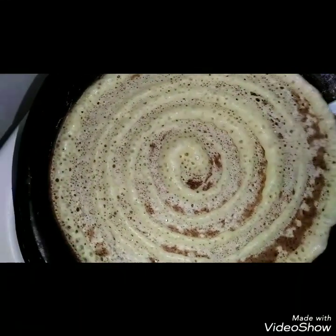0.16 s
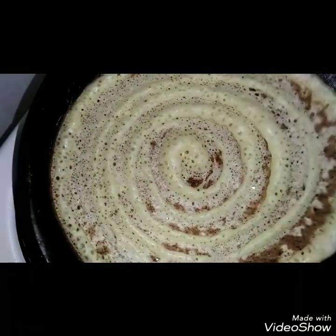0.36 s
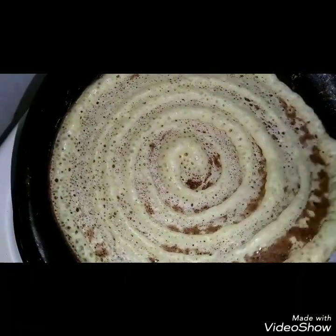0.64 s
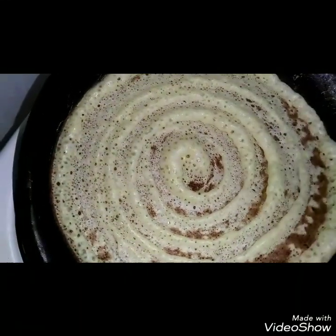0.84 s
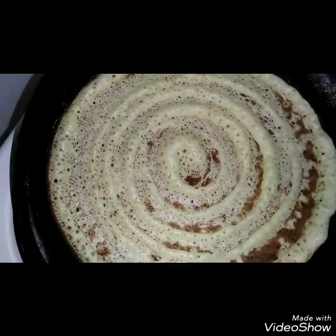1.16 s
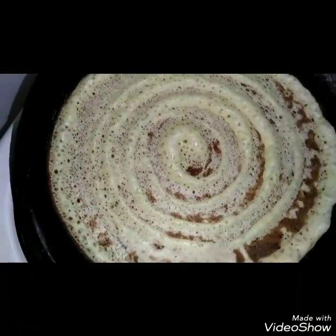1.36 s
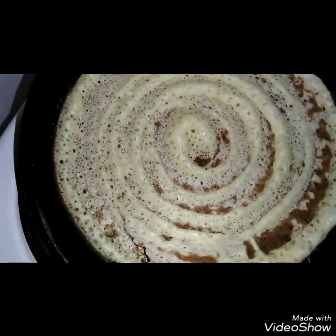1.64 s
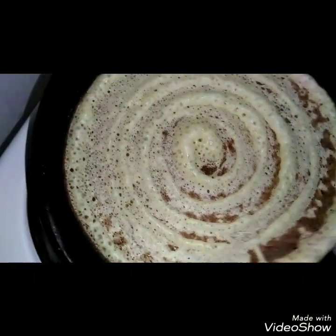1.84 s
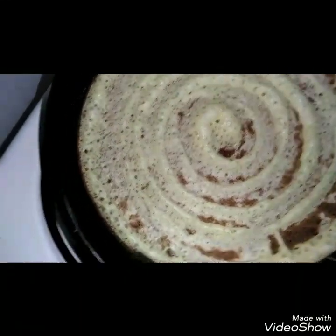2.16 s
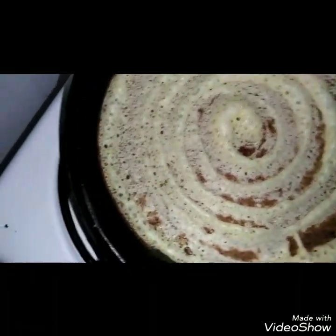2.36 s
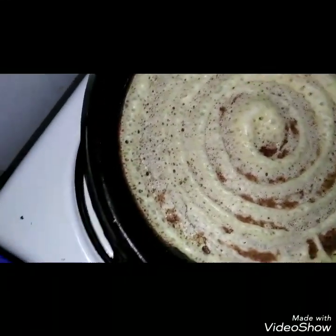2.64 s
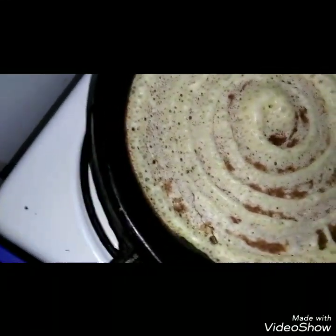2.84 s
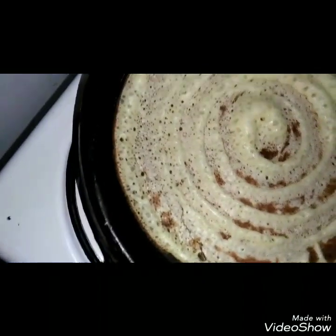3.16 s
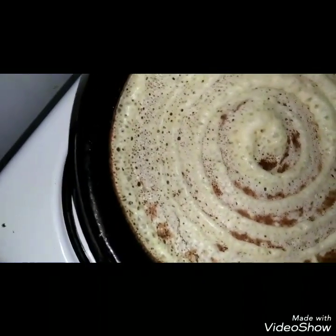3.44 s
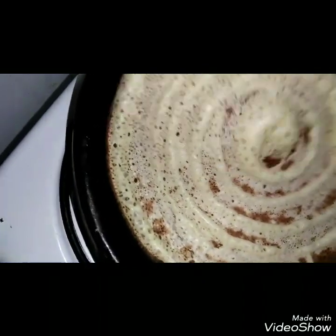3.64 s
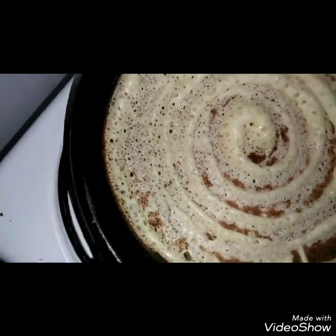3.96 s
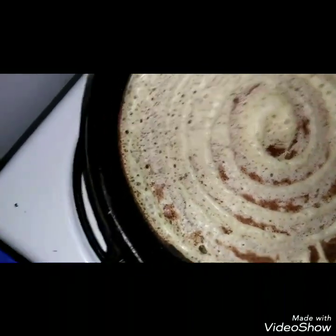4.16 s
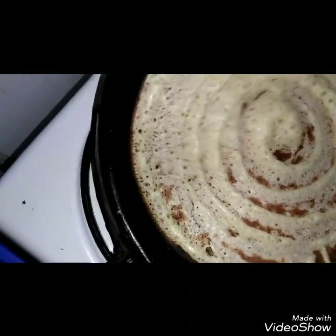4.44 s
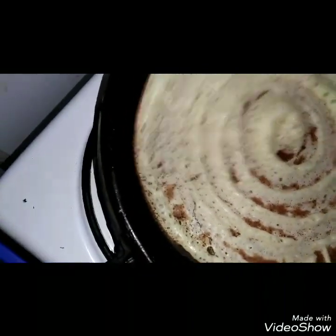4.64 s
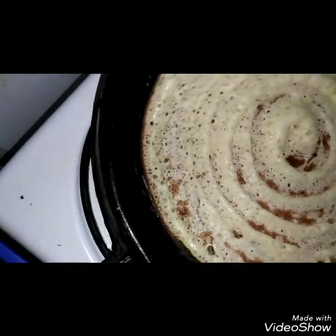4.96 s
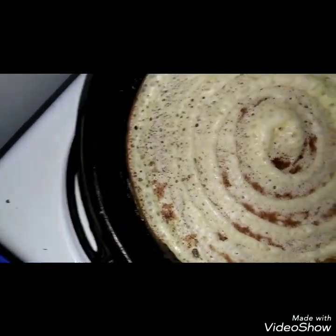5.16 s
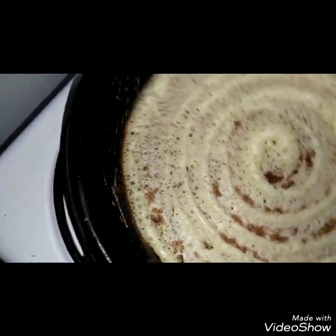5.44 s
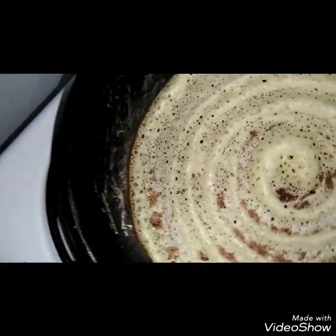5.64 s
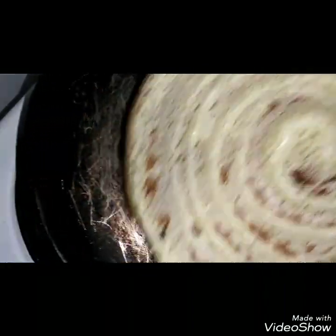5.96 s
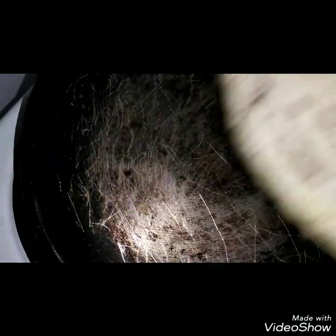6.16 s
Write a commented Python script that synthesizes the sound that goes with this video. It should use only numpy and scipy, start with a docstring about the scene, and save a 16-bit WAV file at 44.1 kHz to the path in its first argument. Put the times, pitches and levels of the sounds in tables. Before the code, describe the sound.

A metal spatula rasps and clicks in quick strokes on an iron pan, which judders and knocks on its stove grate midway.

```python
"""A steel spatula rasps under a thin pancake in quick strokes and clicks on the iron pan, right of a phone.
Rasps, clicks and jabs are noise forces sent through the ringing tones (modes) of blade and pan.
Taps, pings and singing tones are added directly. The pan rocks and drags on the burner grate, hardest
about three seconds in, as rubbing noise and knocks. A small kitchen hums softly and answers with echoes."""
import sys
import numpy as np
from scipy import signal
from scipy.fft import rfft, irfft, next_fast_len
from scipy.io import wavfile
from scipy.ndimage import uniform_filter1d, map_coordinates

SR = 44100
rng = np.random.default_rng(int(sys.argv[2]) if len(sys.argv) > 2 else 0)


def bounce(signal):
    """Save signal as a 16-bit WAV file at the path given by the first command-line argument."""
    frames = np.transpose(np.atleast_2d(signal))
    limited = np.clip(frames, -1, 1)
    pcm = np.round(limited * 32767).astype(np.int16)
    wavfile.write(sys.argv[1], SR, pcm)


N = 277389


def amp(db):
    """Decibels to gain."""
    return 10 ** (np.asarray(db) / 20)


def unit(x):
    """Scaled to rms 1."""
    return x / np.sqrt(np.mean(x ** 2) + 1e-20)


def along(points, hz):
    """Reads a curve of (frequency, value) points, joined by straight lines on a log frequency axis."""
    f, v = np.transpose(points)
    return np.interp(np.log(hz + 1), np.log(f + 1), v)


def wobble(rate):
    """A smooth random curve through this many random points a second."""
    points = rng.standard_normal(int(N * rate / SR) + 4)
    return map_coordinates(points, [np.arange(N) * rate / SR])


def filtered(x, response):
    """Filters x by a gain, real or complex, given as a function of frequency."""
    m = next_fast_len(N + SR // 2)
    return irfft(rfft(x, m) * response(np.fft.rfftfreq(m, 1 / SR)), m)[..., :N]


def causal(gain):
    """The minimum-phase filter with this gain: it answers as early as it can, never beforehand."""
    cep = irfft(np.log(gain + 1e-6))
    half = len(cep) // 2
    cep[1:half] *= 2
    cep[half + 1:] = 0
    return np.exp(rfft(cep))


def modes(table, f, sign=-1):
    """Sum of resonances (Hz, width Hz, dB); equal signs leave dark valleys between them."""
    total = 0
    for k, (hz, width, db) in enumerate(table):
        resonance = 1j * f * width / (hz * hz - f * f + 1j * f * width)  # 1 at its top
        total = total + sign ** k * amp(db) * resonance
    return total


def bands(f, borders_hz, steepness):
    """Power share of each frequency in each band between the borders."""
    below = [0 * f] + [1 / (1 + (f / hz) ** steepness) for hz in borders_hz] + [1 + 0 * f]
    return np.diff(below, axis=0)


def gestures(start, hold, first_db, last_db, swell, fade):
    """Efforts swell, hold and fade at dB per second; (event, part) levels give one gain curve per part."""
    t = np.arange(0, N / SR + .002, .001)
    since = t - start[:, None, None]
    hold = hold[:, None, None] + .001
    db = first_db[..., None] + (last_db - first_db)[..., None] * np.clip(since / hold, 0, 1)
    db = db - swell * np.clip(-since, 0, None)
    db = db - np.reshape(fade, (-1, 1)) * np.clip(since - hold, 0, None)
    gains = np.sqrt(np.sum(amp(db) ** 2, axis=0))
    return np.array([np.interp(np.arange(N) / SR, t, gain) for gain in gains])


def grit(patchy_db, size):
    """Noise whose colour drifts as the point of contact moves over the pan."""
    z = signal.stft(rng.standard_normal(N), nperseg=256)[2]
    field = uniform_filter1d(rng.standard_normal(z.shape), size=2, axis=0)  # smooth over frequency
    field = unit(uniform_filter1d(field, size=size, axis=1))  # and over time
    patches = amp(patchy_db * 1.5 * np.tanh(field / 1.5))
    return unit(signal.istft(z * patches, nperseg=256)[1][:N])


def add(forces, s, burst, parts_db, ring_db, pan_db):
    """Lays one contact on the five parts, as rasp and ring, for the right and the left port."""
    rasp_and_ring_db, right_and_left_db = [0, ring_db], [0, pan_db]
    gains = amp(np.add.outer(np.add.outer(rasp_and_ring_db, right_and_left_db), parts_db))
    forces[..., round(s * SR):][..., :len(burst)] += gains[..., None] * burst


# colour of the kitchen air: (frequency [Hz], relative level [dB])
HUM_COLOUR = [(12, -79.5), (20, -22), (69, -10.5), (102, -2.5), (195, -7), (224, -2.5), (273, -14),
              (332, -4.5), (428, -17), (772, -13.5), (1280, -20.5), (2240, -23.5), (2730, -24),
              (3520, -23.5), (6000, -27), (9000, -31), (16500, -62)]
# how alike the hum is at both ports: (frequency [Hz], likeness [-1 to 1])
HUM_LIKENESS = [(30, 0.82), (70, 0.77), (180, 0.83), (550, 0.44), (1650, -0.13), (4970, -0.28),
                (15000, -0.05)]
HUM_DB = -71.5


def hum():
    """Gently wavering kitchen air: alike at both ports in the bass, nearly unrelated in the treble."""
    turn = lambda hz: np.arccos(np.clip(along(HUM_LIKENESS, hz), -1, 1)) / 2
    pair = rng.standard_normal((2, N)) * amp(2.2 * wobble(5))
    colour = lambda hz: amp(along(HUM_COLOUR, hz)) * [np.cos(turn(hz)), np.sin(turn(hz))]
    mid, side = filtered(pair, colour)
    return amp(HUM_DB) * unit(np.array([mid + side, mid - side]))


def tail(t60, length):
    """A pair of noise tails, each frequency dying at its own speed, scaled to energy 1 in the first."""
    hz, t, z = signal.stft(rng.standard_normal((2, length)), SR, nperseg=128)
    out = signal.istft(z * amp(-60 * t / t60(hz)[:, None]), SR, nperseg=128)[1]
    return out / np.linalg.norm(out[0])


def echoes(x, t60, length, delay):
    """Scattered copies at both ports, drawn anew six times a second so no single draw colours the sound."""
    out, hop = np.zeros((2, N + SR)), SR // 6
    for at in range(0, N, hop):
        echo = signal.fftconvolve(x[None, at:at + hop], tail(t60, length), axes=1)
        out[:, at + delay:][:, :echo.shape[1]] += echo
    return out[:, :N]


# how long the kitchen echoes last: (frequency [Hz], time to fall 60 dB [s])
KITCHEN_T60 = [(200, 0.21), (2000, 0.13), (7000, 0.12), (15000, 0.21)]


def kitchen(blade, pan):
    """The small room answers the blade and the pan with short echoes, 200 samples late."""
    return echoes(amp(-12.5) * blade + amp(-3.0) * pan, lambda hz: along(KITCHEN_T60, hz), SR // 3, 200)


# the blade travels across the pan: (time [s], gain toward the left port [dB])
TRAVEL = [(0.1, 0), (0.7, 1.5), (1.3, -4), (1.8, -7.5), (2.3, 0.5), (2.65, 0.5), (2.9, -3), (3.15, 0.5),
          (3.5, -1), (3.95, -1), (4.2, -6.5), (4.7, 2.5), (5.3, 1), (5.8, -20)]
# the phone shades its left port: (frequency [Hz], left over right [dB], before a 3 dB lift)
SHADOW = [(300, -2.5), (1000, -6.5), (2200, -9), (4500, -16.5), (8000, -16), (15000, -4)]


def left_port(blade):
    """The left port hears the blade shaded by the phone and scattered off stove and hand."""
    moving = blade * amp(np.interp(np.arange(N) / SR, *np.transpose(TRAVEL)))
    shaded = filtered(moving, lambda hz: causal(amp(along(SHADOW, hz) + 3.0)))
    return echoes(shaded, lambda hz: .02 + 0 * hz, 1024, 0)[0]


# colour of the pan's dull body: (frequency [Hz], level [dB])
THUD = [(60, -52), (130, -11.5), (300, -7), (500, -12), (900, -16.5), (1400, -23.5), (2200, -88),
        (3300, -120)]
# modes of the pan on the grate: (pitch [Hz])
IRON_HZ = [164, 233, 292, 358, 441, 507, 633, 801, 1066]
# the same modes: (width [Hz], strength [dB], before a shared 7 dB lift)
IRON = [(17.94, 0), (24.2, -1.5), (15.8, -1), (16, 2), (22.1, -2.5), (15.9, -8.5), (16.07, -9), (22.8, -3),
        (23.06, -12.5)]
# borders between deep, middle and hard judder: (frequency [Hz])
JUDDER_HZ = [400, 660]
# shoves of the pan on the grate, levels before the trims in grate():
# (time [s], hold [s], deep judder [dB], middle judder [dB], hard judder [dB], shake of the phone [dB])
SHOVES = [(0.16, 0.039, -72, -67, -89, -79), (1.645, 0.051, -65, -88, -70.5, -77),
          (1.757, 0.064, -90, -100, -81, -75), (1.836, 0.017, -57.5, -96, -76, -88),
          (1.922, 0.088, -56.5, -96, -51.5, -78), (2.07, 0.055, -85, -97, -59.5, -75),
          (2.387, 0.022, -65, -78, -69, -82), (2.614, 0.16, -66.5, -85, -66, -86),
          (2.81, 0.017, -76, -66, -57, -77), (2.876, 0.09, -59.5, -74, -55, -74),
          (3.002, 0.016, -43.5, -86, -48, -82), (3.075, 0.015, -48, -72, -41.5, -65),
          (3.124, 0.057, -35, -36.5, -43.5, -59), (3.203, 0.02, -44, -39.5, -50, -71),
          (3.263, 0.033, -42.5, -53.5, -48, -68), (3.322, 0.035, -47.5, -64, -57, -72),
          (3.388, 0.046, -55.5, -41, -79, -73), (3.42, 0.05, -47, -52, -89, -80),
          (3.521, 0.046, -54.5, -70, -65.5, -82), (3.706, 0.013, -80, -98, -62, -61),
          (3.893, 0.075, -65, -59, -87, -66.5), (4.223, 0.0044, -52.5, -62, -69, -82),
          (4.553, 0.0078, -84, -93, -48, -70.5), (4.68, 0.1, -66.5, -87, -66.5, -79),
          (4.848, 0.0089, -87, -94, -61, -85), (4.928, 0.013, -88, -98, -88, -64),
          (5.147, 0.088, -69.5, -62, -99, -95)]
SHOVE_SWELL_DB_PER_S, SHOVE_FADE_DB_PER_S = 1198, 554.5
# knocks of the pan on the grate, before a 9 dB lift: (time [s], level [dB])
KNOCKS = [(3.126, -4), (3.155, -7), (3.166, -15), (3.189, -17.5), (3.197, -28.5), (3.221, -22),
          (3.393, -23), (4.233, -39)]


def pan_body(f):
    """The heavy pan answers a force with a dull thud and its low iron modes."""
    iron = [(hz, *rest) for hz, rest in zip(IRON_HZ, IRON)]
    return causal(amp(along(THUD, f))) + amp(7.0) * modes(iron, f, sign=1)


def grate():
    """The heavy pan judders along the grate and knocks on it; the phone shakes in the hand."""
    rows = np.array(SHOVES)
    *levels, shake = gestures(rows[:, 0], rows[:, 1], rows[:, 2:], rows[:, 2:],
                              SHOVE_SWELL_DB_PER_S, SHOVE_FADE_DB_PER_S)
    rub = amp(2.2 * wobble(90)) * rng.standard_normal(N)
    judder = 0
    for k, level in enumerate(levels):
        band = lambda f: pan_body(f) * causal(np.sqrt(bands(f, JUDDER_HZ, 12)[k]))
        judder = judder + level * unit(filtered(rub, band))
    blows = np.zeros(N)
    for s, db in KNOCKS:
        blows[round(s * SR)] = amp(db + 9.0)
    # the shake is a low rumble, partly shared by the two ports
    common, own = rng.standard_normal(N), rng.standard_normal((2, N))
    low_band = lambda f: (f / 85) ** 5 / (1 + (f / 85) ** 6) / (1 + (f / 110) ** 6)
    rumble = unit(filtered(common + 0.94 * own, low_band))
    return amp(-9.0) * judder + filtered(blows, pan_body), shake * amp(1.0) * rumble


# taps on the rim that ping its clearest mode until the blade damps it:
# (time [s], level [dB], time to fall 60 dB while free [s], free ring [s])
PINGS = [(2.813, -40.5, .1, 0.012), (2.889, -29, 0.13, 0.021), (2.952, -41, .1, 0.013),
         (2.9942, -21.5, 0.077, 0.028), (3.071, -35, .2, 0.018), (3.1167, -31, 0.18, 0.025),
         (3.159, -29, 0.12, 0.017), (3.276, -23.5, 0.1, 0.02), (3.536, -41, 0.1, .02),
         (3.927, -30.5, 0.09, 0.016), (4.3892, -39.5, 0.074, 0.024), (4.775, -35.5, 0.11, .02)]
PING_DAMPED_T60_S, PING_PAN_DB = 0.049, -11  # extra fall once damped; left over right


def pings():
    """The rim's mode rings alone as a short, slightly wavering tone."""
    out, t = np.zeros(N + SR), np.arange(SR // 5) / SR
    waver = np.cumsum(rng.standard_normal((len(PINGS), len(t))), axis=1) * .015
    for drift, (s, db, t60, free) in zip(waver, PINGS):
        tone = np.sin(2 * np.pi * STEEL_HZ[1] * t + drift) * (1 - np.exp(-t / 0.0014))
        damping_db = 60 * np.clip(t - free, 0, None) / PING_DAMPED_T60_S
        out[round(s * SR):][:len(t)] += tone * amp(db - 60 * t / t60 - damping_db)
    return out[:N]


# dull taps where the flat of the blade lands: (time [s], level [dB], pitch [Hz], time to fall 60 dB [ms])
TAPS = [(0.5505, -27.5, 2020, 13), (0.5497, -30.5, 3060, 8), (2.812, -55, 1390, 17), (3.128, -36, 1160, 20),
        (0.583, -33, 2000, 8.8), (0.872, -43.5, 1480, 22), (1.077, -42, 1560, 43), (1.208, -34.5, 2160, 31),
        (3.072, -33, 833, 36), (3.351, -37.5, 786, 39), (3.354, -38, 1170, 49), (3.699, -43, 920, 35),
        (3.888, -49, 920, 17), (3.897, -29, 1510, 22), (4.229, -36, 840, 18), (4.366, -37.5, 1540, 44),
        (4.555, -29, 1544, 40), (4.559, -45.5, 787, 41), (4.743, -35, 1480, 46), (4.919, -31.5, 1544, 28)]
TAP_PAN_DB, TAP_RISE_MS = 0.5, 0.3  # left over right before the shading


def taps():
    """Each tap is one quickly damped thock."""
    out, ms = np.zeros(N + SR), np.arange(SR // 10) / SR * 1000
    for s, db, hz, t60 in TAPS:
        tone = np.sin(2 * np.pi * hz * ms / 1000)
        shape = (1 - np.exp(-ms / TAP_RISE_MS)) * amp(db - 60 * ms / t60)
        out[round(s * SR):][:len(ms)] += tone * shape
    return out[:N]


# one mode of the blade catches and sings during a stroke:
# (time [s], hold [s], pitch [Hz], width of each of two resonances in a row [Hz], level [dB])
SINGS = [(0.1, 0.05, 6450, 300, -47), (0.098, 0.018, 2350, 90, -54), (0.155, 0.025, 2700, 200, -56),
         (0.157, 0.025, 1880, 130, -50), (0.36, .018, 5300, 200, -50), (0.358, .012, 6150, 250, -48),
         (0.385, .014, 5500, 500, -49), (0.36, .05, 1900, 300, -60), (0.92, .03, 2340, 80, -61),
         (0.97, 0.04, 1500, 150, -63), (1.36, 0.12, 6770, 200, -55), (1.38, 0.06, 4000, 200, -58),
         (1.37, 0.12, 2300, 250, -59), (1.375, 0.06, 1510, 150, -62), (1.8, .15, 4150, 450, -44),
         (1.96, .2, 4020, 350, -43.5), (1.78, .15, 1480, 150, -56), (1.89, .1, 6770, 80, -51),
         (2.1, .25, 6740, 150, -49), (1.97, .08, 8250, 350, -50), (2.14, .09, 8300, 400, -49),
         (2.63, .05, 2340, 70, -58), (4.11, .08, 1500, 180, -58), (4.84, .115, 2340, 110, -52),
         (4.88, .03, 1500, 150, -54), (4.745, .035, 6770, 120, -45), (4.87, .04, 5900, 150, -48),
         (5.048, .075, 6760, 70, -46), (5.045, .06, 1550, 70, -58), (5.045, .07, 2330, 60, -59),
         (1.78, .45, 14600, 700, -60), (1.78, .3, 11300, 400, -60), (1.8, .4, 9110, 150, -59),
         (3.4, 0.038, 464, 150, -50.5), (3.64, .03, 1300, 130, -59), (3.72, 0.036, 2000, 180, -54),
         (6.065, 0.051, 2250, 360, -74), (6.07, 0.048, 800, 150, -73)]
SING_EDGE_S, SING_PAN_DB = .01, -2.5  # swell and fade time; left over right before the shading


def sings():
    """Grit keeps one mode alive as a fuzzy tone: noise through a narrow resonance, twice."""
    out, t = np.zeros((2, N + SR)), np.arange(SR // 2) / SR - .1  # starts 0.1 s early for the swell
    noise = rng.standard_normal((len(SINGS), 2, len(t)))
    f = np.fft.rfftfreq(len(t), 1 / SR)
    for pair, (s, hold, hz, width_hz, db) in zip(noise, SINGS):
        tone = unit(irfft(rfft(pair) * modes([(hz, width_hz, 0)], f) ** 2, len(t)))
        outside = np.clip(-t, 0, None) + np.clip(t - hold, 0, None)
        shape = np.exp(-outside / SING_EDGE_S)
        out[:, round(s * SR):][:, :len(t)] += amp(db) * shape * tone
    return out[:, SR // 10:][:, :N]


# short jabs that rasp for a moment, levels before the trims in jabs():
# (time [s], level [dB], weight on the pan [dB], blade flex [dB], thin edge [dB], hold [ms])
JABS = [(0.076, -28, -12.5, -16, -31, 62), (0.101, -27, -14, -7, -14, 22),
        (0.1487, -30.5, -5.5, -3, -24.5, 27), (0.354, -23, -13, -49, -30.5, 19.6),
        (0.383, -25.5, -19, -12.5, -36, 17), (0.745, -42, 9.5, 12.5, -18, 9.7),
        (1.2042, -33.5, -4, -2.5, -34, 15.3), (1.347, -51, -4, 12.5, -28, 59),
        (1.631, -35, -4.5, 1.5, -24.5, 18), (2.1036, -38, -20, -8, -19, 12),
        (2.366, -27.5, -16, -4, -18, 21.5), (2.425, -42.5, 5.5, 8, -25, 32),
        (2.683, -28.5, -47, -46, -32.5, 55), (2.8072, -33, -3.5, -39, -27.5, 16),
        (2.9477, -32, 2.5, -26.5, -47.5, 9), (3.0724, -44.5, -22, -26, -33.5, 62),
        (3.343, -27, -10, -4, -23.5, 28), (3.6962, -18, -4, -39, -14, 6.8),
        (3.926, -24, -15, -10, -26.5, 29.5), (4.2126, -26.5, -6, -3, -11, 14.6),
        (4.488, -32, -25, -18, -30, 20), (4.5474, -32, -6, 3.5, -3, 16), (4.631, -23.5, -26, -20, -10, 4.9),
        (4.74, -31.5, -36.5, 3, -22.5, 6.7), (4.8674, -24.5, -28, -30, -42, 36),
        (4.934, -27, -7, -7, -25.5, 15.4), (5.038, -26, -10.5, -28, -38, 15.6),
        (5.254, -46, -14, -31, -31, 26), (5.5435, -43.5, -19, -14.5, -14.5, 34)]
JAB_RING_DB, JAB_PAN_DB = -10.5, -1  # ring over rasp, left over right before the shading
JAB_THUMP_DB = -15.5  # over the table's weight


def jabs():
    """A jab swells, holds its patchy, gritty rasp, then lets go."""
    forces, ms = np.zeros((2, 2, 5, N + SR)), np.arange(SR // 5) / SR * 1000
    noise = grit(patchy_db=7.0, size=16) * amp(0.19 * wobble(250))
    for s, db, weight_db, flex_db, edge_db, hold in JABS:
        release_db = 60 * np.clip(ms - hold, 0, None) / (14 + 1.9 * hold)
        shape = (1 - np.exp(-ms / 3)) * amp(db - 12.0 - release_db)
        parts_db = [weight_db + JAB_THUMP_DB, weight_db + 2.5, flex_db + 2.0, 0, edge_db + 11.5]
        add(forces, s, shape * noise[round(s * SR):][:len(ms)], parts_db, JAB_RING_DB, JAB_PAN_DB)
    return forces[..., :N]


# sharp clicks of the edge, levels before the trims in clicks():
# (time [s], level [dB], weight on the pan [dB], blade flex [dB], thin edge [dB], tail's fall by 60 dB [ms])
CLICKS = [(0.037, -32, -22, -23, -22, 65), (0.284, -22, -18, -47, -21, 32),
          (0.5497, -39.5, 2.5, -2, -11, 12), (0.5835, -16.5, -20, -12.5, -14, 31),
          (0.8715, -32.5, -33, 5.5, -7.5, 58), (1.021, -30, -40, -4, -26, 23),
          (1.078, -33.5, -14, -7, -10.5, 38), (1.134, -41, -31, -7, -21, 88),
          (1.2074, -38, -18, 13, -2, 134), (1.7434, -44, -2, 17, 3.5, 53),
          (1.8006, -32.5, -2.5, -7, -24.5, 220), (1.989, -28.5, -19.5, -13, -18, 25),
          (2.001, -23.5, -21, -8, -19.5, 15), (2.02, -25.5, -27, 2, -14.5, 28),
          (2.205, -25.5, -35, -12, -12, 18), (2.104, -25, -17.5, -12, -19, 20),
          (2.309, -30.5, -20, -20, -16, 25), (2.3833, -31.5, -11, 6.5, -23, 130),
          (2.617, -33, -12.5, -3.5, -8, 117), (2.889, -51, 1, -23, -30, 36),
          (2.916, -32, -10, -9, -10.5, 78), (2.997, -36.5, -2.5, 6.5, -33, 90),
          (3.0692, -13.5, -12.5, -23, -40.5, 72), (3.116, -27.5, -7, -20, -30.5, 250),
          (3.262, -20.5, -16.5, -18, -14.5, 67), (3.275, -29, -3.5, -14, -25, 130),
          (3.414, -25, -16.5, -17, -15, 51), (3.5553, -22.5, -13.5, -13, -11.5, 93),
          (3.705, -27, -9, -1, -14, 4.3), (3.887, -31.5, -8, -20.5, -22, 25),
          (3.897, -19.5, -15, -7.5, -16, 156), (4.231, -20.5, -8, -2, -17.5, 13),
          (4.3639, -11, -25, -14, -21.5, 57), (4.7419, -17, -20.5, -7, -17, 52),
          (4.759, -22, -31, -30, -26, 8.1), (4.8503, -23.5, -22.5, -34, -27, 72),
          (4.9184, -16, -19, -31, -11.5, 20), (5.275, -38, -9.5, -26, -17.5, 124),
          (5.473, -51, -5, -12, -4.5, 16), (5.615, -51, -26, -35, -12, 52),
          (5.7063, -46.5, -20, -29, -12.5, 58), (6.256, -57.5, -32.5, -32, -20.5, 13)]
CLICK_RING_DB, CLICK_PAN_DB = 10.5, 0.5  # ring over rasp, left over right before the shading
CLICK_TAIL_DB, CLICK_CRACK_DB = -17, -16  # over the table's level
CLICK_CRACK_MS = 6.6  # time to fall 60 dB


def clicks():
    """A click is one sharp landing of the edge, a short crack and a dying tail of grit."""
    forces, ms = np.zeros((2, 2, 5, N + SR)), np.arange(SR // 5) / SR * 1000
    noise = rng.standard_normal((len(CLICKS), len(ms)))
    for row, (s, db, weight_db, flex_db, edge_db, t60) in zip(noise, CLICKS):
        dying = amp(db + CLICK_TAIL_DB - 60 * ms / t60)
        crack = amp(db + CLICK_CRACK_DB - 60 * ms / CLICK_CRACK_MS)
        burst = row * (dying + crack)
        burst[0] = amp(db - 4.5)  # the edge lands at once
        parts_db = [weight_db - 3.0, weight_db + 10.5, flex_db, 0, edge_db + 12.5]
        add(forces, s, burst, parts_db, CLICK_RING_DB, CLICK_PAN_DB)
    return forces[..., :N]


# strokes of the blade; the last three levels are over the rasp:
# (time [s], hold [s], rasp at start [dB], rasp at end [dB],
#  weight on the pan [dB], blade flex [dB], thin edge hiss [dB])
STROKES = [(0, 0.031, -58, -73, -2.5, -16, -6), (0.084, 0.096, -49, -49, -10.5, -4, 0),
           (0.203, 0.039, -63, -60, -22, -10, -12), (0.306, 0.033, -50.5, -71, -7.5, -26, -12),
           (0.364, 0.1, -48, -55, -3, -13, -1.5), (0.614, 0.047, -51.5, -47, -10, -3.5, -2),
           (0.707, 0.085, -72, -68.5, 6, 10.5, 2), (0.895, 0.1, -60, -52, -6.5, -1, 2.5),
           (1.075, 0.11, -61, -73.5, -8, -11, -2), (1.227, 0.059, -52, -67.5, -5, -10, -1),
           (1.348, .12, -63, -52.5, -11.5, 5, 6), (1.638, 0.067, -61, -61.5, -0.5, 2.5, 5.5),
           (1.763, 0.2, -54.5, -53, 4, 11, 4), (1.987, 0.18, -55, -54, -7.5, 11, 8.5),
           (2.111, 0.094, -47, -53, -3.5, 3.5, 5), (2.178, 0.2, -44, -43.5, -17.5, -15, -9.5),
           (2.392, 0.054, -62.5, -47.5, -7.5, 1, -3.5), (2.547, 0.036, -59, -76, 0, -3, -3.5),
           (2.641, 0.087, -57.5, -49.5, -15.5, -11, -0.5), (2.81, 0.2, -68, -76, 4.5, -2, 1),
           (2.91, 0.17, -69, -38, -16.5, -8.5, -6.5), (3.087, 0.059, -49.5, -63, 2, -0.5, -10),
           (3.211, 0.024, -53, -79, 11, -7, -7.5), (3.313, 0.099, -48.5, -43, -15.5, -10, 0.5),
           (3.595, 0.13, -66, -60, 0, -1.5, 7), (3.717, 0.082, -60, -67, 2, -10, 1.5),
           (3.924, 0.01, -58, -49.5, 7.5, -2.5, 3.5), (3.99, 0.18, -49, -38.5, -20, -20, -12.5),
           (4.23, 0.091, -53, -56, -13.5, -20, -2), (4.373, 0.17, -54.5, -52, -12, -18, -5),
           (4.57, 0.061, -64, -57, -3.5, -10, 6), (4.774, 0.044, -47, -60, -1.5, -14, -6.5),
           (4.854, 0.087, -50, -45.5, -11, -5.5, 1), (5.053, 0.074, -44.5, -56, -11, -8.5, -1),
           (5.25, 0.24, -77, -86, 3.5, -1, 2), (5.478, 0.12, -79.5, -74.5, -1.5, -4, 8.5),
           (5.613, 0.055, -78, -84, -1, -12, -7), (5.706, 0.095, -76, -86.5, -3, -19, 3),
           (6.089, 0.058, -88.5, -93.5, 12, 7.5, -16), (6.148, 0.12, -87.5, -91.5, -4, 2.5, -1)]
STROKE_SWELL_DB_PER_S = 499
# how fast each part lets go, for thump, weight, flex, rasp, edge: (fade [dB per s])
STROKE_FADE = [300, 308, 320.4, 250, 332]
STROKE_THUMP_DB = -13  # over the weight


def strokes():
    """Dense stuttering grit under the edge; its colour drifts as the blade travels."""
    s, hold, first_db, last_db, weight_db, flex_db, edge_db = np.transpose(STROKES)
    parts_db = np.transpose([weight_db + STROKE_THUMP_DB, weight_db, flex_db, 0 * s, edge_db])
    effort = gestures(s, hold, first_db[:, None] + parts_db, last_db[:, None] + parts_db,
                      STROKE_SWELL_DB_PER_S, STROKE_FADE)
    slow_db = .6 * wobble(30) + 2.5 * np.tanh(wobble(150))
    fast_db = 2 * wobble(700) + 2.6 * wobble(2500)
    stutter = unit(amp(slow_db + fast_db))
    rasp = np.array([[grit(patchy_db=4, size=26)] for port in range(2)])
    ring = np.array([[grit(patchy_db=5, size=24)] for port in range(2)])
    return np.array([stutter * effort * rasp, stutter * effort * amp(8.0) * ring])


# colour of the broad rasp: (frequency [Hz], relative level [dB])
RASP = [(240, -40.5), (400, -18.5), (555, -41), (806, -18.5), (1210, -9.5), (1500, -7), (1700, -2.5),
        (2700, -5), (3100, -5), (3550, -9.5), (4000, -8.5), (5300, 3), (6500, 9), (7400, -1), (8300, -5.5),
        (9300, -17), (10000, -19.5), (11300, -22.5), (12700, -25.5), (14500, -23), (15700, -43),
        (16500, -56)]
# modes of blade and pan: (pitch [Hz])
STEEL_HZ = [1500, 2332, 3160, 3950, 5140, 5858, 6290, 6770, 8004, 9110, 10830, 11310, 12500, 14600]
# the same modes: (width [Hz], strength [dB])
STEEL = [(115, -11), (55, -4.5), (61.2, -7), (247, -5), (148, -0.5), (40.8, 5.5), (41.5, 2), (40.5, 5.5),
         (40.3, -4), (77.3, -18), (59.8, -19.5), (118, -23.5), (201, -26.5), (399, -35)]
# borders between thump, pan weight, blade flex, rasp and thin edge: (frequency [Hz])
PARTS_HZ = [1250, 2800, 4700, 9400]


def steel(force, ring):
    """Forces on the five parts sound as broad rasp plus the ringing modes of blade and pan."""
    m = next_fast_len(N + SR // 2)
    f = np.fft.rfftfreq(m, 1 / SR)
    broad = causal(amp(along(RASP, f)))
    ringing = modes([(hz, *rest) for hz, rest in zip(STEEL_HZ, STEEL)], f)
    shares = np.sqrt(np.abs(bands(f, PARTS_HZ, 16)))
    out = 0
    for part in range(5):
        cut = causal(shares[part])
        cut = cut / np.sqrt(np.mean(np.abs(broad * cut) ** 2))  # every part's rasp equally strong
        out = out + cut * (broad * rfft(force[:, part], m) + ringing * rfft(ring[:, part], m))
    return irfft(out, m)[:, :N]


def scene():
    """The right port faces the blade; pan, pings, kitchen, shake and hum join at both ports."""
    blade = steel(*(strokes() + clicks() + jabs()))
    blade = blade + taps() * amp([[0], [TAP_PAN_DB]])
    right, left = blade + sings() * amp([[0], [SING_PAN_DB]])
    pan, shake = grate()
    near = np.array([left_port(left), right]) + pan * amp(2.5)
    near = near + pings() * amp([[PING_PAN_DB], [0]])
    return near + kitchen(right, pan) + shake + hum()


TOP_HZ = 16600


def record(dry):
    """Nothing sounds above TOP_HZ."""
    return filtered(dry, lambda hz: hz < TOP_HZ)


dry = scene()
out = record(dry)
bounce(out)
```